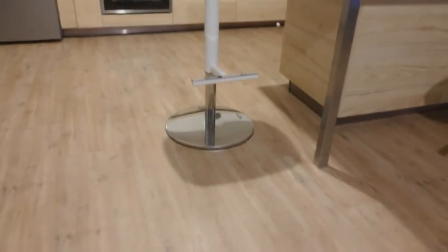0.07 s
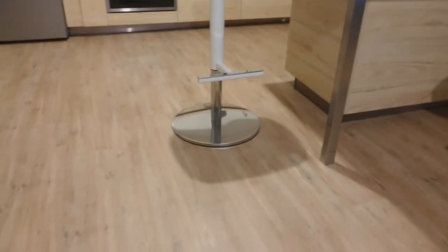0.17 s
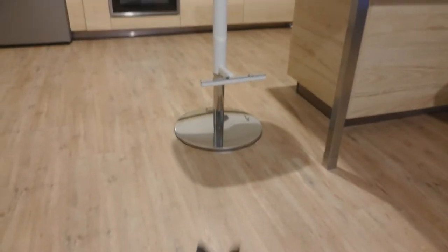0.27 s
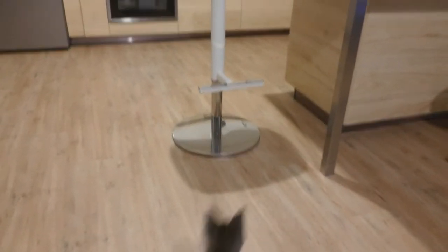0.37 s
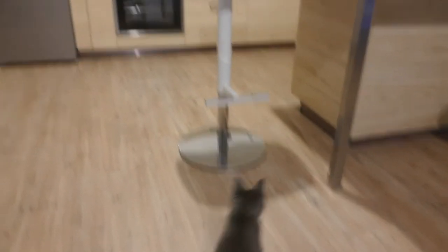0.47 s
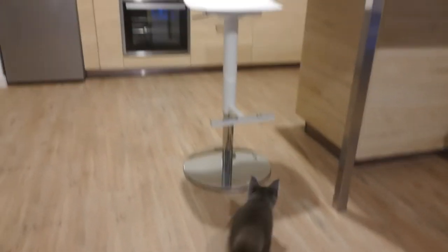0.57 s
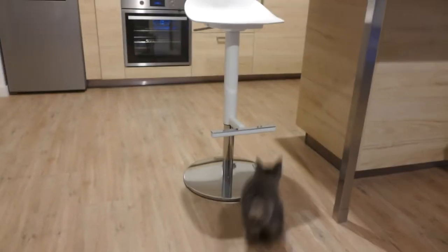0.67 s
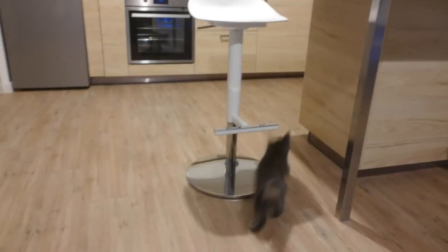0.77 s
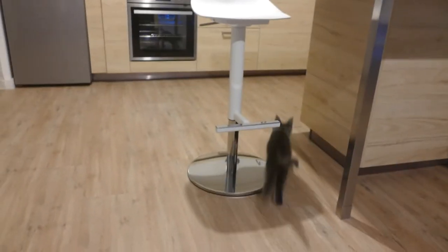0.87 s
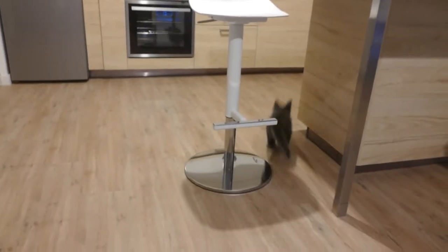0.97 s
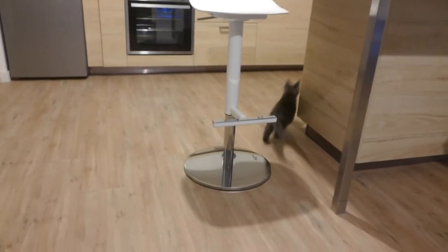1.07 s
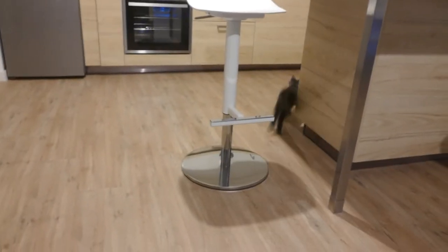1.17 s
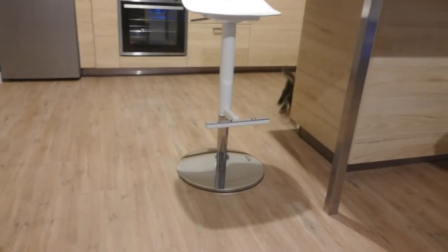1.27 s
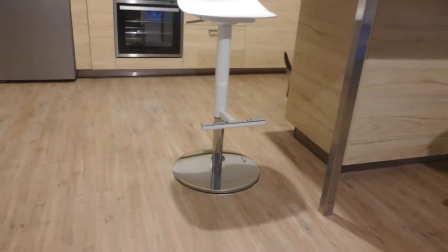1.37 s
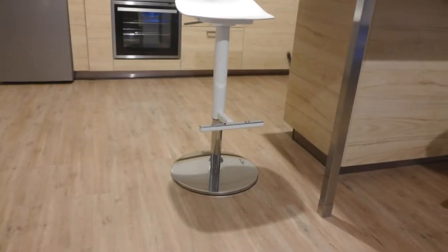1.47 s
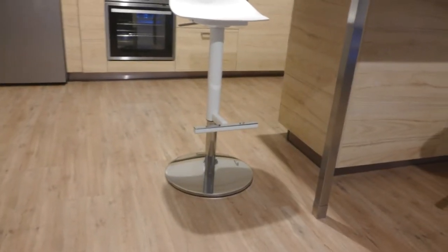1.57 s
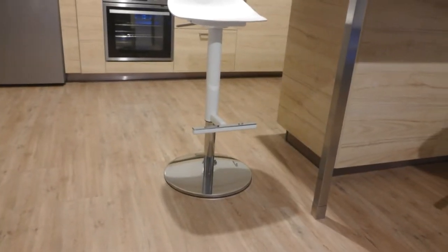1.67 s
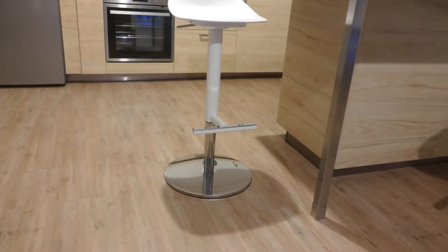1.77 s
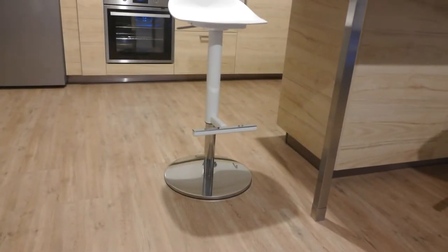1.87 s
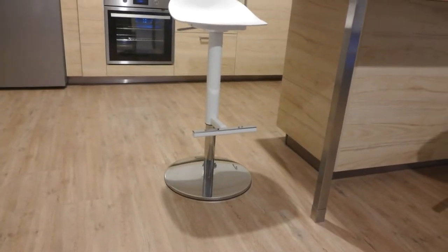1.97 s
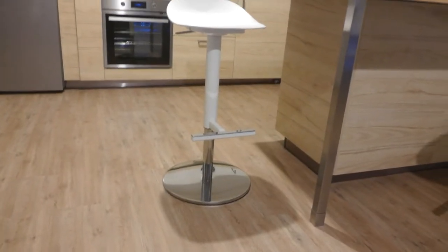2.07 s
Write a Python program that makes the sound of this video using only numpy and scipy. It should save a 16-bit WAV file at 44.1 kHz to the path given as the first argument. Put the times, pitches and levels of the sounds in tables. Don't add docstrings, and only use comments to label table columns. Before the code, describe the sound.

A crumpled foil ball taps, then knocks hard once on a laminate floor and skitters off with faint kitten paw taps in a quiet, live kitchen; dry clicks and rubbing of the hand on the camera end it.

```python
import sys
import numpy as np
from scipy import signal
from scipy.fft import rfft, irfft
from scipy.io import wavfile
from scipy.ndimage import uniform_filter1d

SR = 44100
rng = np.random.default_rng(int(sys.argv[2]) if len(sys.argv) > 2 else 0)


def voltage_ratio(level):
    return 10 ** (np.asarray(level, float) / 20)


def wav_record(signal):
    frames = np.transpose(np.atleast_2d(signal))
    bounded = np.clip(frames, -1, 1)
    quanta = np.round(bounded * 32767).astype(np.int16)
    wavfile.write(sys.argv[1], SR, quanta)


N = 92610


def evened(x):
    return x / np.sqrt(np.mean(x ** 2) + 1e-20)


def read(points, hz):
    f, value = np.transpose(points)
    return np.interp(np.log(hz + 1), np.log(f + 1), value)


def add(mix, s, sound):
    at = round(s * SR)
    sound = sound[..., max(-at, 0):]
    part = mix[..., max(at, 0):][..., :sound.shape[-1]]
    part += sound[..., :part.shape[-1]]


def ring(hz, width_hz, size=3000):
    t = np.arange(size) / SR
    return np.exp(-np.pi * width_hz * t) * np.sin(2 * np.pi * hz * t)


# frequency [Hz], left-right likeness [0 to 1].
PORT_LIKENESS = [(60, 0.83), (200, 0.85), (500, 0.66), (800, 0.56), (1300, 0.039), (15000, 0.11)]


def port_pair(size, colour_db, lean):
    hz = np.fft.rfftfreq(size, 1 / SR)
    a, b = rfft(rng.standard_normal((2, size)))
    same = np.clip(read(PORT_LIKENESS, hz), 0, 1)
    pair = np.array([a, same * a + np.sqrt(1 - same ** 2) * b])
    lean_db = np.outer([.5, -.5], read(lean, hz))
    return hz, pair * voltage_ratio(colour_db(hz) + lean_db)


# frequency [Hz], level [dB per Hz].
AIR_COLOUR = [(24, -54), (40, -0.5), (189, -0.5), (363, -6), (715, -7), (5720, -19), (7730, -20),
              (13400, -34.5), (16000, -53)]
# frequency [Hz], left minus right [dB].
AIR_LEAN = [(60, -5.5), (180, -5), (1650, -4.5), (5000, -2.5), (8500, -8), (11000, 3), (15000, -2.5)]


def air():
    level_db, swell_db = -58.5, 0.48 * 20 / 20
    swell = voltage_ratio(swell_db * evened(uniform_filter1d(rng.standard_normal(N), 3000)))
    spectra = port_pair(N, lambda hz: read(AIR_COLOUR, hz), AIR_LEAN)[1]
    return voltage_ratio(level_db) * swell * evened(irfft(spectra, N))


# time in seconds [s], hiss level [dB].
SLIDE_STROKE = [(1.83, -80), (1.846, -64), (1.885, -54.5), (1.94, -55.5), (1.98, -59), (1.99, -51.5),
                (2.055, -52.5), (2.1, -50.5)]
# frequency [Hz], level [dB per Hz].
SLIDE_COLOUR = [(180, -47), (300, -1.5), (366, -24), (725, -1), (1250, -11), (1580, -5), (5250, -13.5),
                (7820, -12), (11000, -26.5), (16000, -30)]
# frequency [Hz], left minus right [dB].
SLIDE_LEAN = [(240, -7.5), (950, -2), (4500, -3), (6000, -4), (8500, -9), (10500, 7.5), (15000, 9.5)]


def slide():
    fizz_hz, fizz_width_hz, fizz_db, fizz_start_s = 14300, 4400, -64, 1.987
    s, db = np.transpose(SLIDE_STROKE)
    t = np.arange(N) / SR
    hiss = evened(irfft(port_pair(N, lambda hz: read(SLIDE_COLOUR, hz), SLIDE_LEAN)[1], N))
    grain = voltage_ratio(1.4 * evened(uniform_filter1d(rng.standard_normal(N), 200)))
    fizz_ring = ring(fizz_hz, fizz_width_hz, size=200)
    fizz = evened(signal.oaconvolve(rng.standard_normal(N), fizz_ring)[:N]) * (t > fizz_start_s)
    stroke = voltage_ratio(np.interp(t, s, db, left=-120) + 0.5)
    return grain * (hiss * stroke + fizz * voltage_ratio(fizz_db + np.array([[4], [-6]])))


# frequency [Hz], width [Hz], level [dB].
SNAP_MODES = [(1940, 380, -0.5), (3164, 510, 1.5), (3640, 450, 1.5), (4460, 440, -5), (5900, 500, -10.5),
              (11100, 4300, -3)]


def snap_of(spread):
    modes = enumerate(zip(SNAP_MODES, spread))
    return sum((-1) ** k * voltage_ratio(db) * ring(hz * u, width) for k, ((hz, width, db), u) in modes)


def to_ports(case, snap):
    lag = round(.00045 * SR)
    left = voltage_ratio(-13.5) * np.roll(case, lag) + voltage_ratio(-4.5) * snap
    right = case + np.roll(uniform_filter1d(snap, size=3), lag)
    return np.array([left, right])


CREAK_HZ = 719


# start [s], ring level [dB], case pitch [Hz], snap level [dB].
CLICKS = [(1.3932, -19.5, 1120, -64), (1.4052, -29.5, 745, -36), (1.4082, -31, 770, -39),
          (1.4222, -25.5, 740, -41), (1.4252, -24, 740, -40), (1.4285, -46, 740, -36),
          (1.4302, -31, 1110, -30.5), (1.4502, -35, 760, -66), (1.4562, -26, 820, -40),
          (1.6795, -31, 780, -46), (1.6874, -22.5, 740, -36.5), (1.7040, -28, 1170, -57),
          (2.061, -21.5, 1240, -35), (2.0626, -5.5, 642, -26), (2.065, -24, 690, -27.5),
          (2.0712, -33, 800, -42), (2.0752, -35, 740, -33), (2.0792, -30, 800, -37),
          (2.0905, -32, 795, -39), (2.0955, -14.5, 835, -28)]
# frequency [Hz], width [Hz].
NAIL_TICK = [(6500, 1100), (9300, 1300), (12300, 1500), (15000, 1500)]


def clicks():
    case, snap = np.zeros((2, N))
    soft = 1 - np.exp(-np.arange(3000) / SR / 0.0004)
    spread = rng.uniform(.94, 1.06, (len(CLICKS), len(SNAP_MODES)))
    for (s, db, hz, snap_db), row in zip(CLICKS, spread):
        body = ring(hz, 280) + 0.32 * ring(1.61 * hz, 245) + 0.068 * ring(CREAK_HZ, 70)
        add(case, s + 0.000833, voltage_ratio(db) * soft * body)
        add(snap, s, voltage_ratio(snap_db) * snap_of(row))
    add(snap, 2.0612, voltage_ratio(-23) * sum(ring(f, w) for f, w in NAIL_TICK))
    return case, snap


# start [s], length [s], level [dB].
CREAKS = [
    (1.4, 0.021, -38.5),
    (1.419, 0.018, -32.5),
    (1.45, 0.016, -44.5),
    (2.058, 0.031, -32.5),
    (2.086, .03, -25.5),
]


def creaks():
    slips_per_s, ramp_s = 1600, 0.006
    t = np.arange(N) / SR
    slips = rng.standard_normal(N) * (rng.random(N) < slips_per_s / SR)
    press = np.zeros(N)
    for s, length, db in CREAKS:
        press += voltage_ratio(db) * np.clip(np.minimum(t - s, s + length - t) / ramp_s, 0, 1)
    case_ring = ring(CREAK_HZ, 50) + 1.3 * ring(907, 84)
    case = evened(signal.oaconvolve(slips, case_ring)[:N]) * press
    crack = snap_of(np.ones(len(SNAP_MODES)))
    snap = voltage_ratio(-21) * evened(signal.oaconvolve(slips, crack)[:N]) * press
    return case, snap


def hand():
    haze_t60_s, haze_db = 0.22, -9.5
    case, snap = np.array(clicks()) + np.array(creaks())
    low_cut = signal.butter(4, 555, 'high', fs=SR, output='sos')
    dry = signal.sosfilt(low_cut, to_ports(case, snap))
    haze = rng.standard_normal((2, 9000)) * voltage_ratio(-60 * np.arange(9000) / SR / haze_t60_s)
    haze /= np.linalg.norm(haze[0])
    return dry + voltage_ratio(haze_db) * signal.fftconvolve(dry, haze, axes=1)[:, :N]


# start [s], level [dB], frequency [Hz], width [Hz].
PAWS = [(0.819, -47, 123, 14), (.88, -49, 220, 20), (1.09, -51, 104, 17), (1.555, -51, 80, 17),
        (1.583, -44.5, 124, 20), (1.86, -54.5, 97, 8.4), (1.839, -41, 1000, 430), (1.849, -41, 1100, 270),
        (1.6, -42, 1800, 180), (1.5, -40, 1400, 180), (1.1, -34, 1850, 770), (.823, -41, 510, 65),
        (1.594, -46, 138, 38), (1.55, -33, 1600, 460), (1.558, -34, 1500, 310), (1.571, -44, 620, 130),
        (.2415, -14.5, 650, 100), (.2455, -7, 444, 55), (.247, -13, 1680, 160), (.2665, -11.5, 227, 35),
        (.266, -21.5, 470, 130), (0.29, -24, 2500, 400), (0.38, -27.5, 2540, 280), (.186, -23, 1600, 200),
        (1.6, -42, 390, 53), (1.547, -48, 3800, 460), (.272, -21, 2410, 140), (.183, -35, 950, 250),
        (.19, -39, 780, 200), (0.17, -24, 1680, 110), (.205, -27.5, 922, 90), (.215, -32.5, 995, 110),
        (.226, -32, 980, 39), (.602, -39, 5500, 430), (.758, -44.5, 9200, 600), (0.8127, -31, 6560, 750),
        (0.94, -31, 1200, 230), (1.3, -33, 870, 280), (1.205, -49, 4200, 280), (1.21, -25, 1260, 620)]


def paws():
    out = np.zeros((2, N))
    t = np.arange(6000) / SR
    for s, db, hz, width_hz in PAWS:
        rise_s = 0.91 / hz + .0003
        bump = ring(hz, width_hz, size=6000) * (1 - np.exp(-t / rise_s))
        add(out, s, voltage_ratio(db + np.array([[-2], [2]])) * bump)
    return out


# frequency [Hz], reverberation time t60 [s].
ROOM_DECAY = [(60, 1.4), (120, 0.74), (250, 0.61), (500, 0.7), (1200, 0.62), (3000, 0.95), (8000, 0.65),
              (15000, 0.18)]
# frequency [Hz], left minus right [dB].
ROOM_LEAN = [(60, 2.5), (180, -4), (950, -2), (4500, -4), (5600, -3), (8500, -9.5), (11000, 7.5),
             (15000, -0.5)]


def room_hit(colour_db, rise_s, early_db, size=40960):
    early_t60_s = 0.16
    hz, pair = port_pair(size, colour_db, ROOM_LEAN)
    pair /= np.sqrt(np.mean(irfft(pair) ** 2))
    t, out = np.arange(size) / SR, np.zeros((2, size))
    centres = np.array([f for f, _ in ROOM_DECAY])
    for k, (f, t60) in enumerate(ROOM_DECAY):
        share = np.interp(np.log(hz + 1), np.log(centres), np.arange(len(centres)) == k)
        rise = 1 - np.exp(-t / (rise_s * (500 / f) ** .5))
        decay = voltage_ratio(-60 * t / t60) + voltage_ratio(early_db - 60 * t / early_t60_s)
        out += irfft(pair * share) * rise * decay
    return out


# frequency [Hz], level [dB per Hz].
TAP_COLOUR = [(35, -55.5), (60, -12), (903, -4.5), (1410, -6), (1740, -4), (2580, -10.5), (7570, -17.5),
              (14600, -40.5), (16000, -58.5)]


def tap(db, body_hz, bright_db, weight_db):
    body_peak_db, body_spread, direct_db, direct_s = 9.5, .14, -16, 0.00091

    def colour_db(hz):
        body = body_peak_db / (1 + ((hz / body_hz - 1) / body_spread) ** 2)
        bright = bright_db * hz / (hz + 3000)
        weight = weight_db * 400 / (hz + 400)
        return read(TAP_COLOUR, hz) + body + bright + weight
    out = room_hit(colour_db, rise_s=0.0015, early_db=-0.5)
    tick = voltage_ratio(direct_db) * np.exp(-np.arange(out.shape[1]) / SR / direct_s)
    return voltage_ratio(db - 13) * out * (1 + tick)


# start [s], peak level [dB], body pitch [Hz], brightness [dB], weight [dB].
TAPS = [(0.181, -26.5, 800, 3, -1.5), (0.194, -37.5, 1760, -9, -18), (0.598, -37.5, 700, 5.5, -4),
        (0.754, -61, 1064, -10, 3), (0.813, -40.5, 1020, 22.5, 36), (0.871, -47, 900, -12, 13),
        (0.884, -50, 603, -5, 13), (0.949, -50.5, 1050, 7, -4), (1.087, -46, 824, -3.5, 16),
        (1.11, -46, 595, -9, 16), (1.139, -61, 590, -21, 3), (1.208, -42, 745, -22, -20),
        (1.547, -40, 1350, -6, 6), (1.569, -42.5, 710, 5, 17), (1.595, -43.5, 810, -6, 21),
        (1.838, -40, 1170, -28, -12), (1.87, -44.5, 980, 13, -10)]
# [s, dB, Hz, dB, dB].
BRUSHES = [
    (-.01, -30.5, 1900, 5, -6),
    (0.209, -50.5, 930, -12, -6),
    (.52, -38.5, 2140, 4, -6),
    (1.475, -45.5, 3820, 2.5, -3),
]
# peak level [dB], body pitch [Hz], brightness [dB], weight [dB].
EARLIER_TAP = (-23, 749, 7, 6.5)


def far_taps():
    out = np.zeros((2, N))
    add(out, -.03, tap(*EARLIER_TAP))
    for s, *blow in list(TAPS) + list(BRUSHES):
        add(out, s, tap(*blow))
    return out


# frequency [Hz], level [dB per Hz].
THUD_COLOUR = [(60, -41), (115, -12.5), (165, -12.5), (260, -4), (560, -8), (1950, -23.5), (2750, -23.5),
               (3250, -33.5), (7500, -33), (14000, -47)]
# frequency [Hz], level [dB], ring time t60 [s].
BOARD_MODES = [(117.4, -3, 0.51), (219, 2, 0.54), (270.7, 1, 0.25), (344.4, 1, 0.2), (390.5, -0.5, 0.59),
               (425.6, -1.5, 0.32), (477.3, 4, 0.56), (549.5, -7.5, 0.68), (637, -9, 0.69), (839, -7, 0.32),
               (916, -16.5, 0.27), (1020, -17, 0.5)]


def thud():
    wash_db, boards_db, boards_rise_s = -18, -25, 0.007
    t, start = np.arange(30000) / SR, rng.uniform(0, 2 * np.pi, len(BOARD_MODES))
    boards = np.zeros(len(t))
    for (hz, db, t60), phase in zip(BOARD_MODES, start):
        boards += voltage_ratio(db - 60 * t / np.clip(t60, .3, .9)) * np.sin(2 * np.pi * hz * t + phase)
    boards *= np.minimum(t / boards_rise_s, 1)
    out = voltage_ratio(wash_db) * room_hit(lambda hz: read(THUD_COLOUR, hz), rise_s=0.0019, early_db=-14.5)
    add(out, 0, voltage_ratio(boards_db) * boards * voltage_ratio(np.array([[-1.5], [1.5]])))
    return out


def scene():
    mix = air() + slide() + hand() + paws() + far_taps()
    add(mix, .2405, thud())
    return mix


def right_port(dry):
    hz, width_hz, boost_db = 7460, 1170, 8
    port = ring(hz, width_hz, size=200)
    port *= (voltage_ratio(boost_db) - 1) * 2 * np.pi * width_hz / SR
    slope = np.gradient(dry, axis=1) * SR / (2 * np.pi * hz)
    return signal.oaconvolve(slope, port[None])[:, :N] * np.array([[0], [1]])


def gate(x):
    threshold_db, depth_db, knee_db = -54.5, -5.5, 2
    level_db = 10 * np.log10(uniform_filter1d((x ** 2).mean(0), size=900) + 1e-12)
    over = np.clip((level_db - threshold_db) / knee_db, -30, 30)
    return x * voltage_ratio(depth_db / (1 + np.exp(over)))


def roll_off(x):
    return signal.sosfilt(signal.butter(12, 16530, fs=SR, output="sos"), x)


def record(dry):
    low_cut = signal.butter(2, 45, 'high', fs=SR, output='sos')
    gated = gate(signal.sosfilt(low_cut, dry + right_port(dry)))
    edge = signal.firwin(numtaps=255, cutoff=15950, window=('kaiser', 9), fs=SR)[None]
    mix = signal.oaconvolve(gated, edge, 'same')
    return roll_off(mix)


dry = scene()
out = record(dry)
wav_record(out)
```